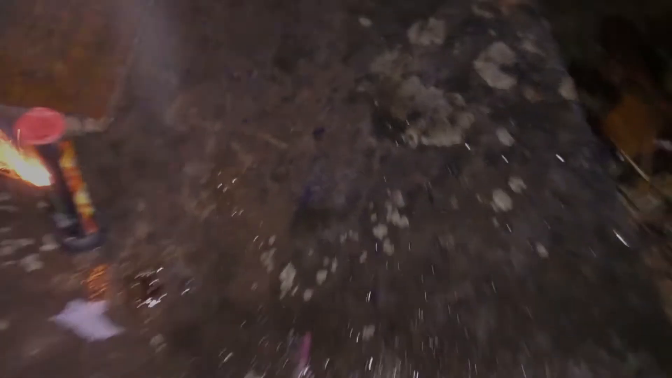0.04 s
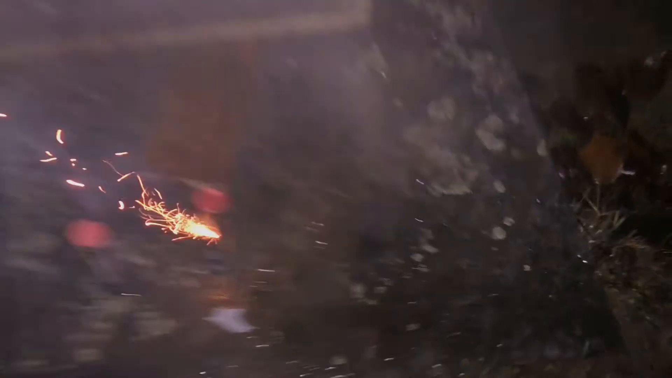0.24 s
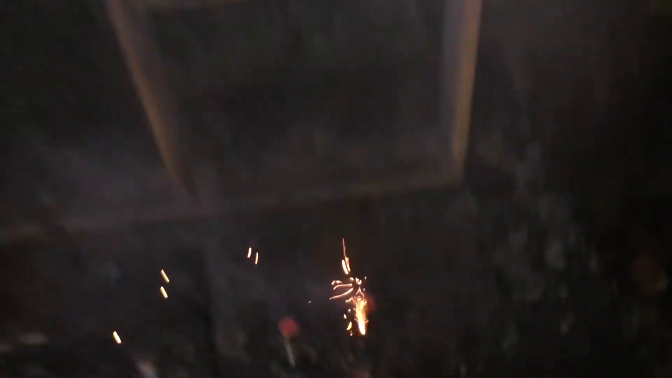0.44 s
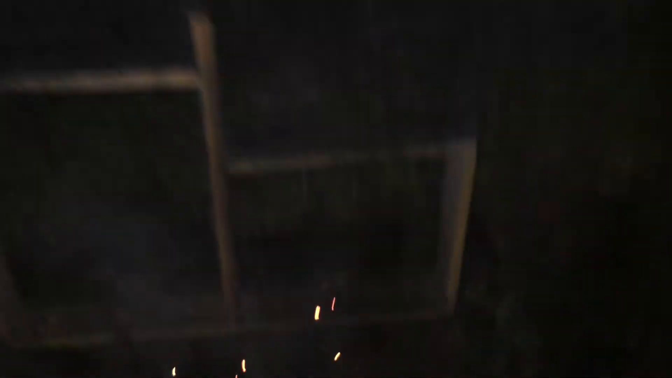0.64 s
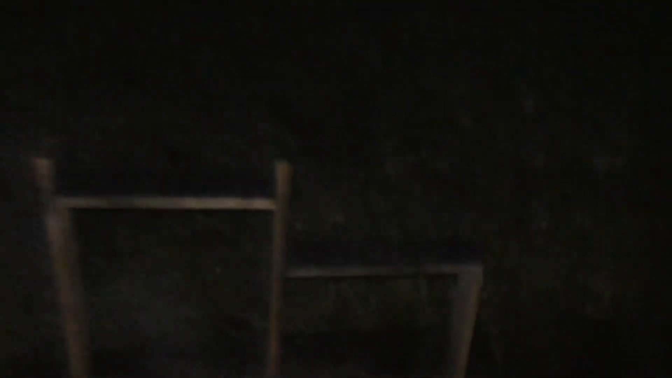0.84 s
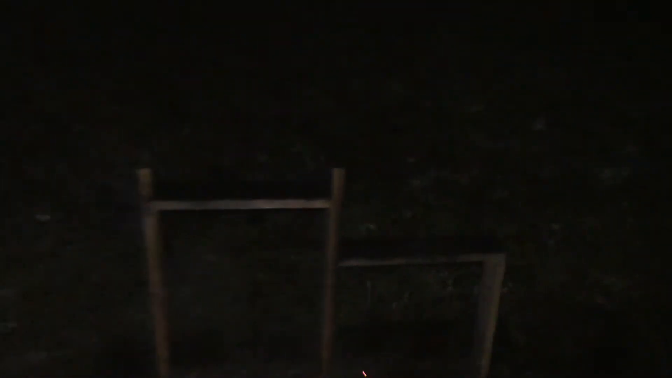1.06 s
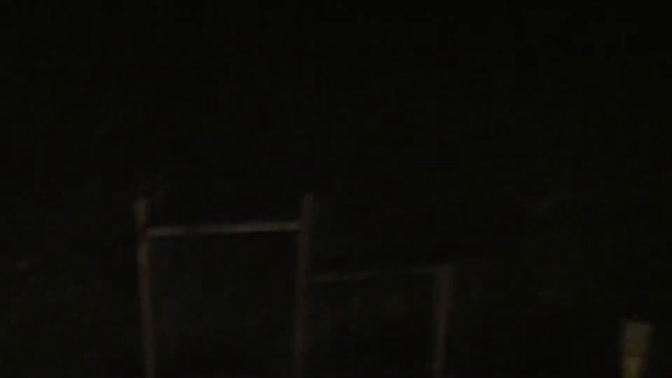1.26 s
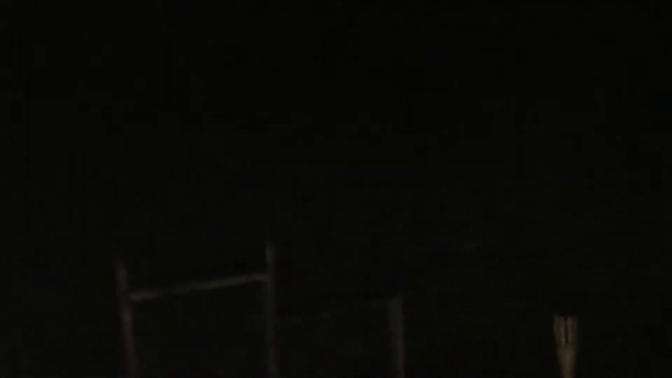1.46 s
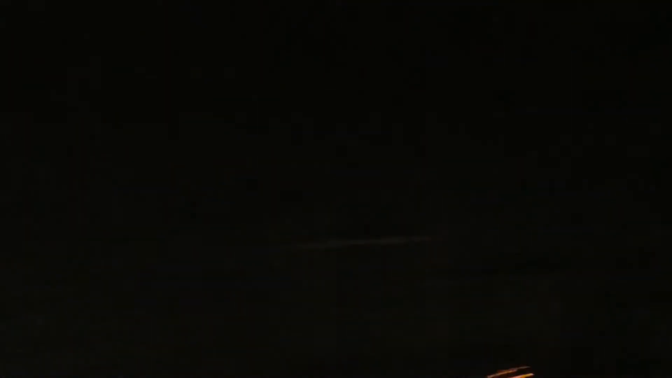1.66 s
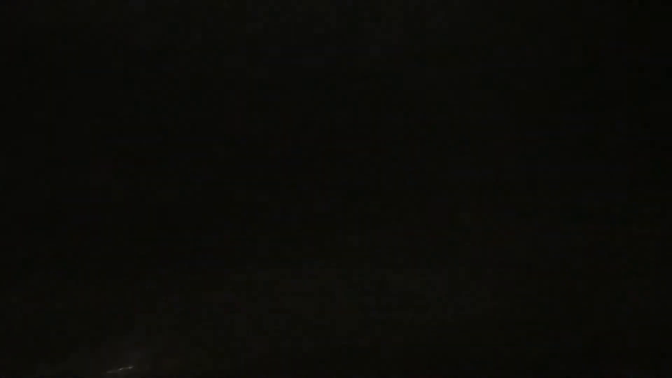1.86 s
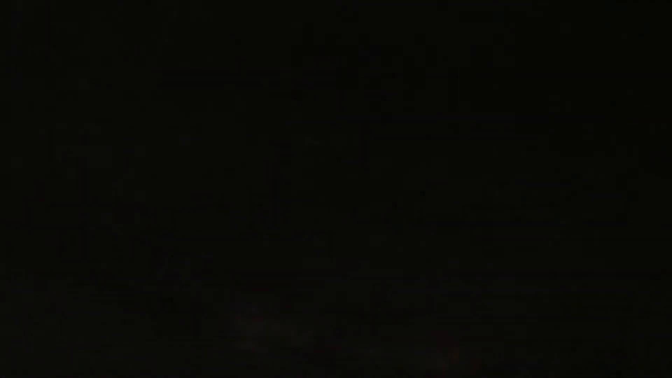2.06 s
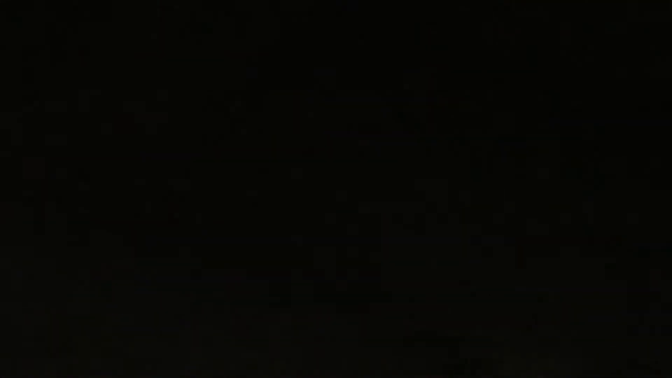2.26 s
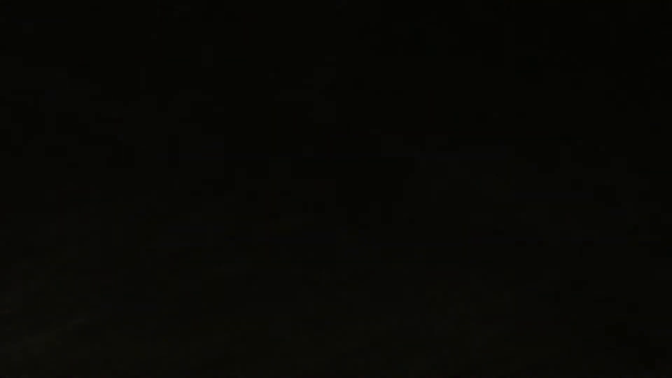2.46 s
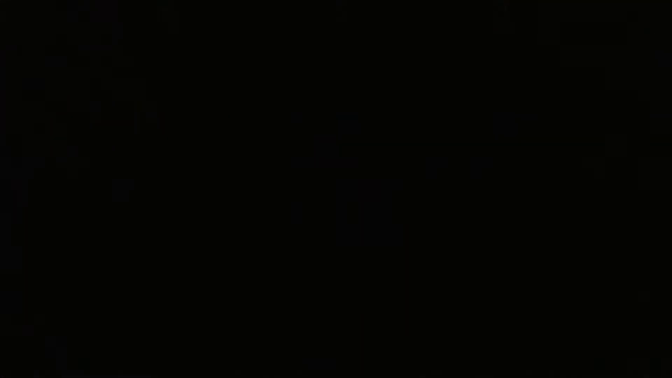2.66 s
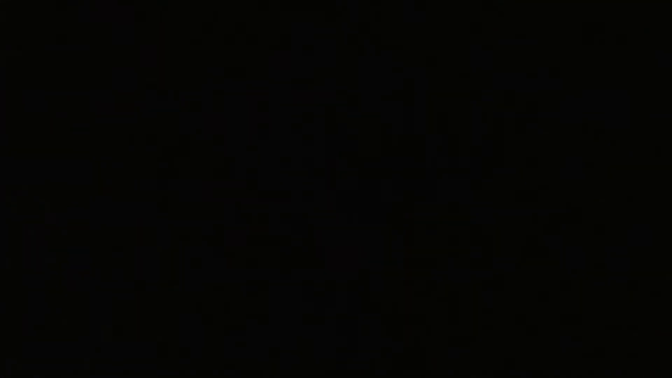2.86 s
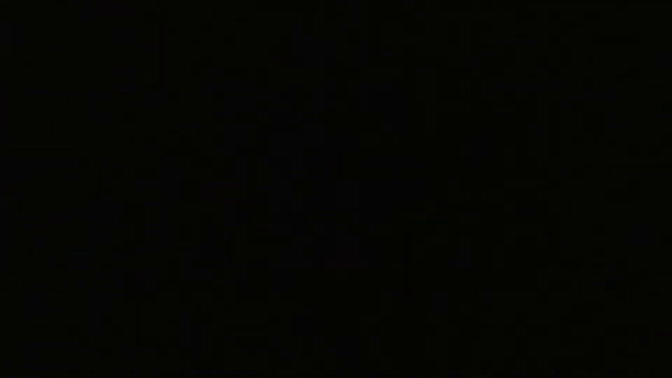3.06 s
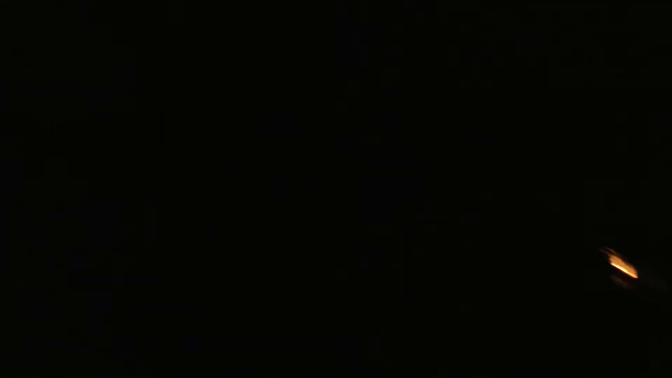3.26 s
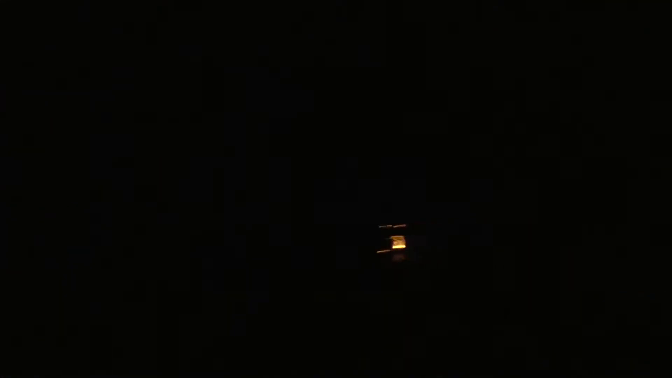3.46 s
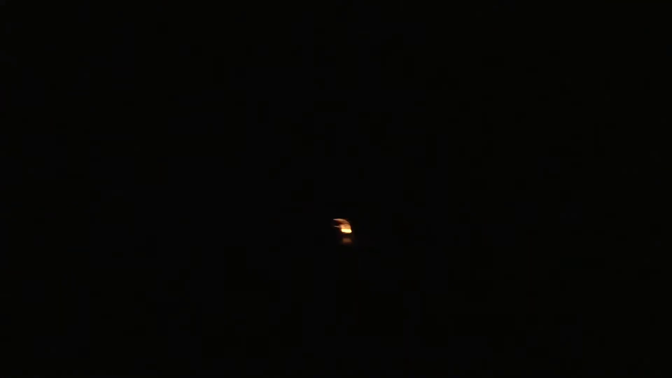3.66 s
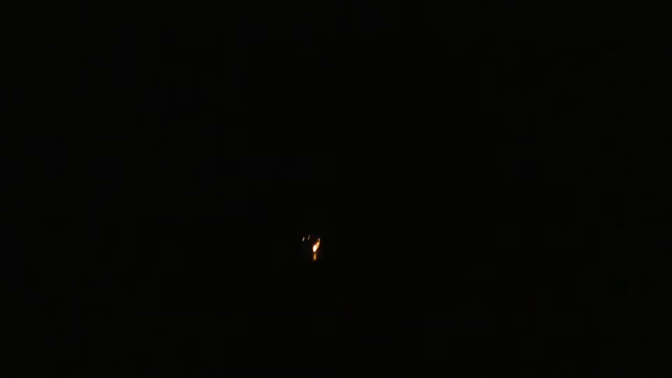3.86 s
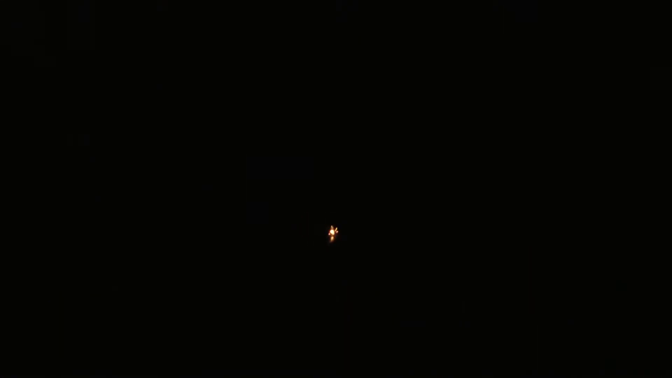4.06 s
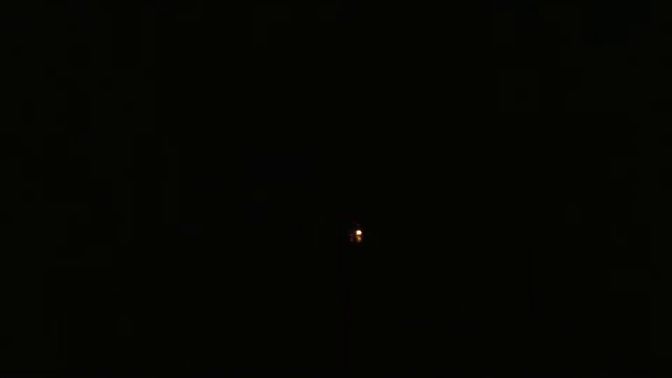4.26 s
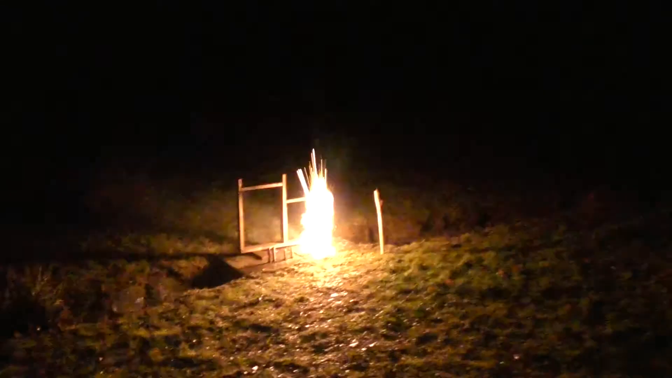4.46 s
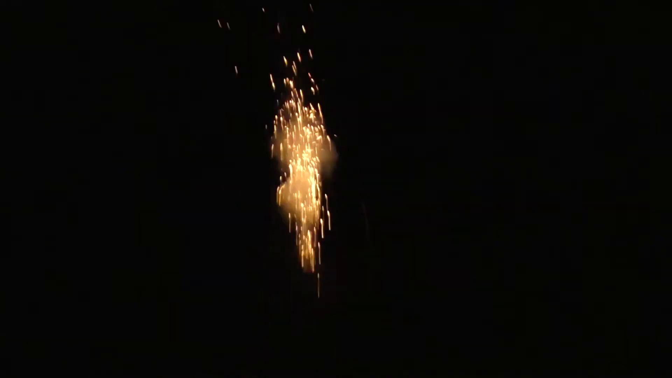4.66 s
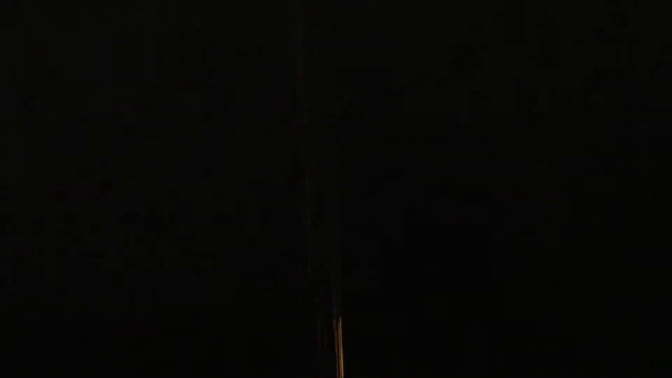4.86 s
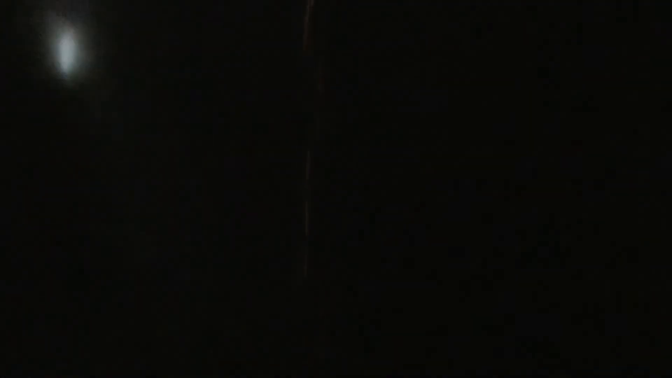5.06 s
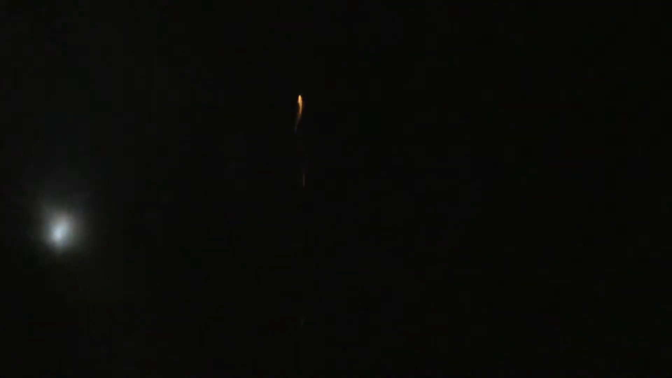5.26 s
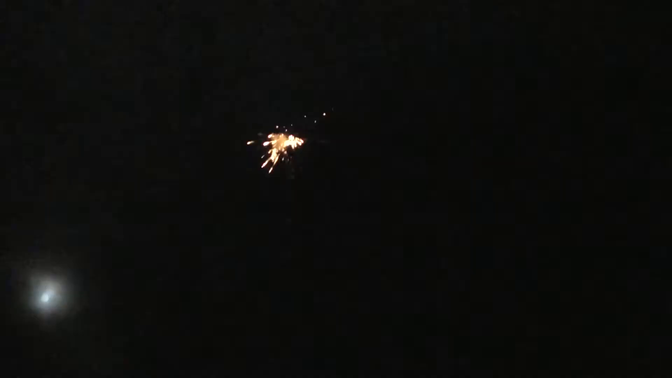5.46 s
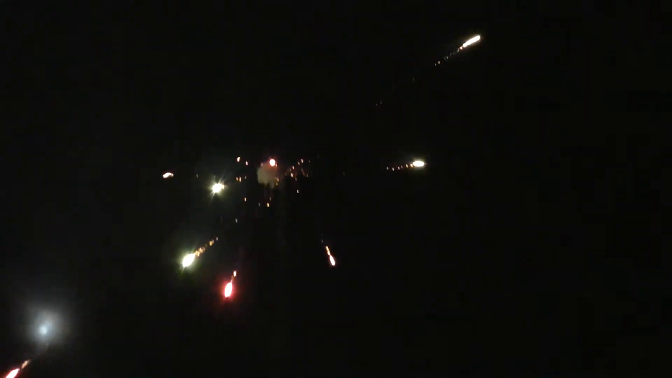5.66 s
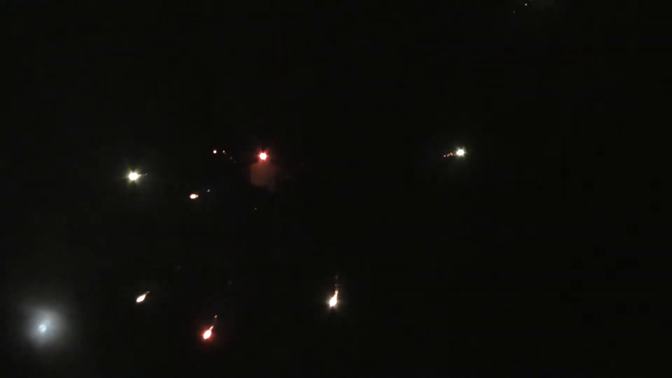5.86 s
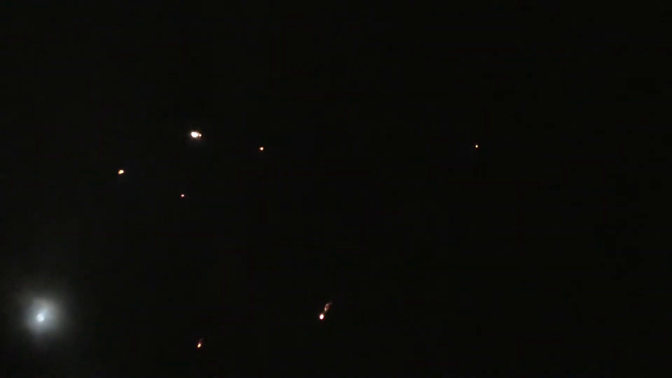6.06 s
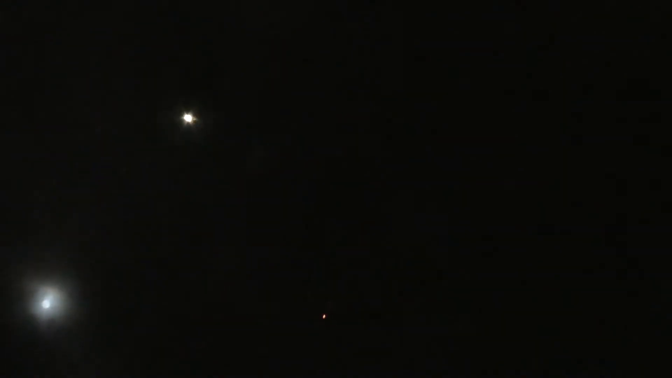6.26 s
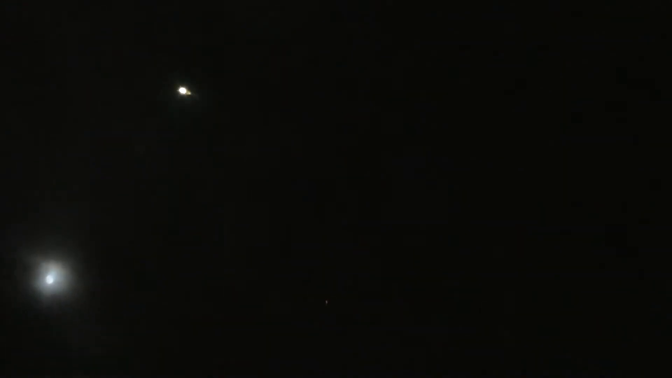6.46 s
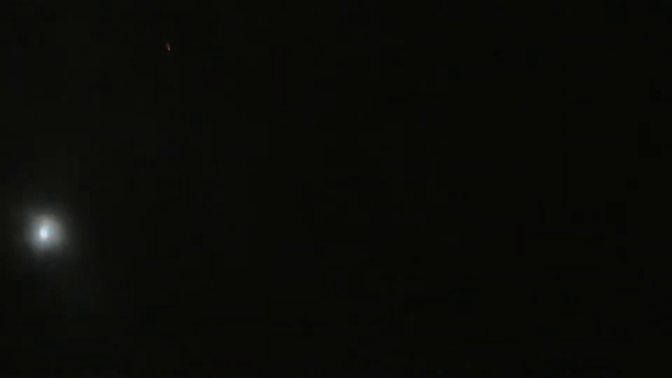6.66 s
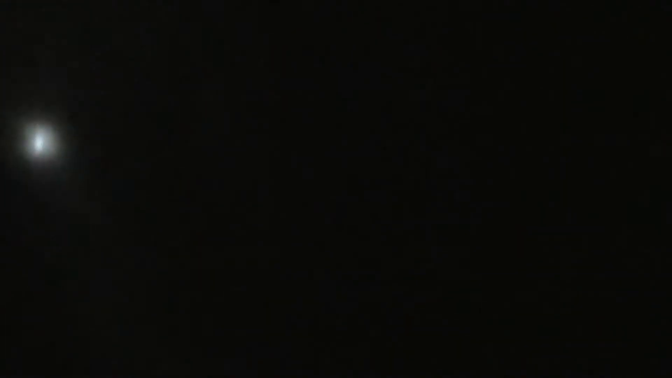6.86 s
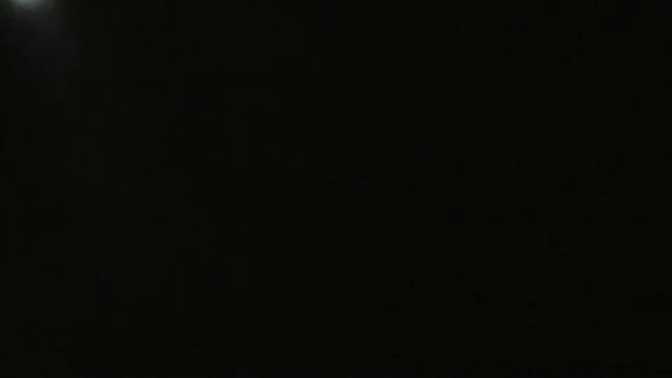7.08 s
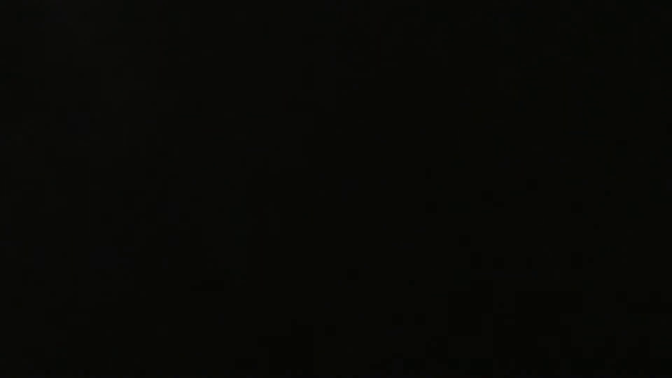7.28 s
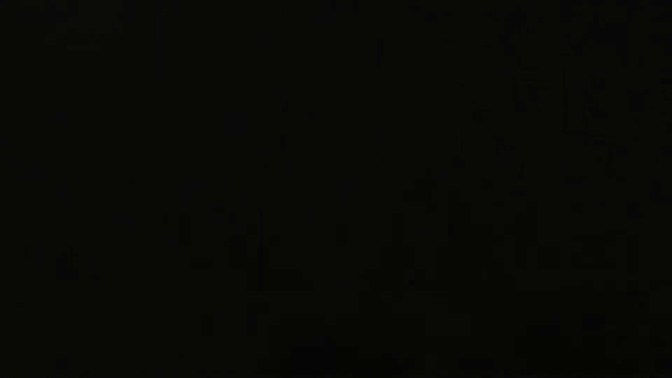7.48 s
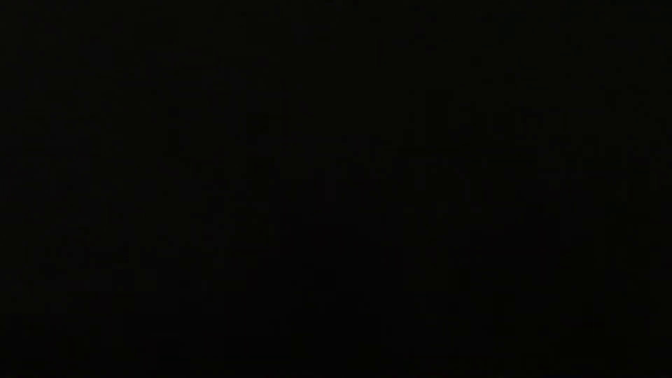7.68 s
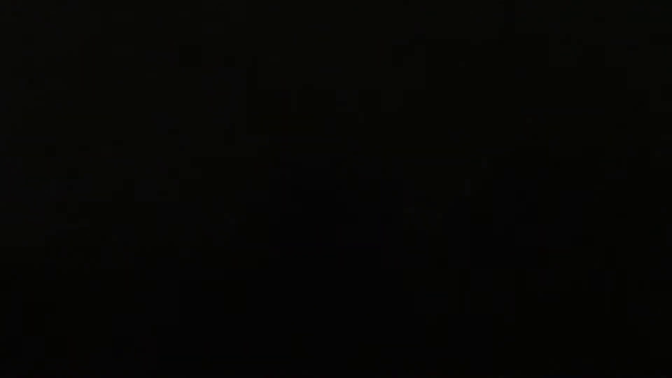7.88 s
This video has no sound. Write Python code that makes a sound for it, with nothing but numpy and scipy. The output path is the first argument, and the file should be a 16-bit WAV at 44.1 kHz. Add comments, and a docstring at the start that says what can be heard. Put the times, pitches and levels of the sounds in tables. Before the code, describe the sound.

A handheld microphone starts about a metre from a hissing, crackling fuse and moves off across grass, with footsteps, clothing rustle and low wind buffeting. Midway an unseen firework bangs dully and echoes. Then the nearby tube launches with a punchy crack and brief roar, followed by the loudest bang in the sky. Scattered snaps and a wide rumbling roll return from walls, trees and far slopes, fading to quiet.

```python
"""Damp open ground at night, with walls, trees and far slopes around: a firework tube is lit, fires and bursts.
The fuse hisses (filtered clicks with a ground-reflection comb) as the microphone is carried away over the grass.
A hidden firework thuds, the tube fires and its shell bursts: N-waves, a roar of shaped noise and fizzing sparks.
Each bang returns as single snaps and as a roll of clicks, duller the longer it has travelled; the loudest clip.
Beneath lie footsteps, wind at the microphone, low rumble, rustling grass and clothes, and faint hiss."""
import sys
import numpy as np
from scipy import signal
from scipy.fft import rfft, irfft
from scipy.io import wavfile
from scipy.ndimage import uniform_filter1d

SR = 44100
rng = np.random.default_rng(int(sys.argv[2]) if len(sys.argv) > 2 else 0)


def int16_out(signal):
    """Quantize to a 16-bit WAV file."""
    q = np.round(np.clip(np.atleast_2d(signal).T, -1, 1) * 32767)
    wavfile.write(sys.argv[1], SR, q.astype(np.int16))


N = 349536
TIME = np.arange(N) / SR


def amp(db):
    """Decibels to amplitude ratio."""
    return 10 ** (np.asarray(db) / 20)


def evened(x):
    """Scales a signal to an rms of one."""
    return x / np.sqrt(np.mean(x ** 2) + 1e-20)


def colour(points, hz):
    """Reads a spectrum in dB by interpolating along a log-frequency axis."""
    freq_hz, db = np.transpose(points)
    return np.interp(np.log(hz + 1), np.log(freq_hz), db)


def level(curve):
    """Gain over time from rows (time_s, level_db), silent outside them."""
    time_s, db = np.transpose(curve)
    return amp(np.interp(TIME, time_s, db, left=-np.inf, right=-np.inf))


def swell(peak_s, db, length_s, rise):
    """Power over time: a Gaussian rise lasting a share of the length, then an exponential decay."""
    age = (TIME - peak_s) / length_s
    exponent = np.where(age < 0, (age / rise) ** 2, age)
    return amp(db) ** 2 * np.exp(-2 * np.minimum(exponent, 40))


def add(mix, start_s, sound):
    """Superposes a stereo sound on the mix from its start time."""
    part = mix[:, round(start_s * SR):][:, :sound.shape[1]]
    part += sound[:, :part.shape[1]]


def band(x, hz, kind, order=2):
    """Causal Butterworth low-, high- or band-pass."""
    sos = signal.butter(order, np.clip(hz, 1, .49 * SR), kind, fs=SR, output="sos")
    return signal.sosfilt(sos, x)


def spread(pair, side_db):
    """Mid-side stereo: one signal is common to both channels, the other has opposite signs in them."""
    side = amp(side_db) * pair[1]
    return np.array([pair[0] + side, pair[0] - side])


def flutter(hz):
    """Random modulation of rms one: noise low-passed at the given rate."""
    spectrum = rfft(rng.standard_normal(N))
    lowpass = 1 / (1 + (np.fft.rfftfreq(N, 1 / SR) / hz) ** 4)
    return evened(irfft(spectrum * lowpass, N))


def grains(per_s, size_db, side_db):
    """Shot noise: random clicks of uneven size and either sign, each with a direction of its own."""
    size = amp(size_db * np.minimum(rng.exponential(1, (2, N)), 4))
    sign = rng.choice([-1, 1], (2, N))
    struck = rng.random((2, N)) < per_s / SR
    return spread(evened(size * sign * struck), side_db)


def shaped(x, field, size=512, patchy_db=0):
    """Time-varying filter: field(hz, s) in dB plus drifting patches, at unit mean-square gain in each frame."""
    overlap = size - size // 4
    hz, t, spectrum = signal.stft(x, SR, nperseg=size, noverlap=overlap)
    patches = rng.standard_normal((len(hz), len(t)))
    patches = uniform_filter1d(uniform_filter1d(patches, size=4, axis=0), size=24, axis=1)
    gain = amp(field(hz[:, None], t[None]) + patchy_db * evened(patches))
    gain = gain / np.sqrt(np.mean(gain ** 2, axis=0))
    return signal.istft(spectrum * gain, SR, nperseg=size, noverlap=overlap)[1][:, :N]


def fuse(sputter_db=1.02, rough_hz=42000, sway=0.021, mirror_near=0.23, mirror_far=.66,
         thin_start=0.19, thin_settled=0.38, thin_per_m=.12):
    """Inverse-distance spreading and ground interference: spitting powder fades, thins and its comb rises."""
    # spectra of the fuse close by and from a few metres: freq_hz, level_db_per_hz
    near_colour = [(150, -5), (500, 0), (1200, -1.5), (1750, 5.5), (2350, 2), (3000, -3.5), (4000, -4),
                   (7000, -2.5), (9500, -1), (12000, -4), (16000, -6)]
    thin_colour = [(150, 2.5), (500, -16.5), (1200, -15.5), (2300, -6), (4100, 0), (5500, -5), (7300, -1.5),
                   (9200, -1.5), (12000, -7.5), (16000, -3.5)]
    # the microphone moves away from the fuse: time_s, distance_m
    path = [(0, 0.98), (.5, 1.176), (1.2, 1.53), (1.55, 2.1), (2, 2.86), (3, 5.2), (3.7, 6.04), (4.2, 8.9)]
    # how fiercely the fuse burns, heard from one metre: time_s, level_db
    burn = [(0, -28), (.4, -31), (.53, -29.5), (.59, -34.5), (.73, -38), (.95, -32), (1.38, -35.5),
            (1.45, -30.5), (2.25, -31.5), (2.42, -37), (2.87, -35.5), (2.98, -29.5), (3.25, -32.5),
            (3.8, -27.5), (4.5, -30.5)]
    first_flare_s, settle_s = .54, 0.037  # the freshly lit end roars, then settles to a thinner hiss
    comb_hz_per_m = 2194  # spacing of the comb's peaks, in step with the distance
    port_lag_s = .000017  # the hiss reaches the left microphone port first

    def metres(t):
        return np.interp(t, *np.transpose(path))

    def field(hz, t):
        settled = np.clip((t - first_flare_s) / settle_s, 0, 1)
        thin = np.clip(thin_start + thin_settled * settled + thin_per_m * (metres(t) - 1), 0, 1)
        source_db = (1 - thin) * colour(near_colour, hz) + thin * colour(thin_colour, hz)
        hand_sway = 1 + sway * np.interp(t, TIME, flutter(18))
        spacing_hz = comb_hz_per_m * metres(t) * hand_sway
        strength = np.clip(mirror_near + (mirror_far - mirror_near) * settled, 0, .9)
        # rough ground scatters the treble out of the reflection
        mirror = strength * np.exp(2j * np.pi * hz / spacing_hz - hz / rough_hz)
        return source_db + 20 * np.log10(abs(1 + mirror))

    sparks = shaped(grains(per_s=16000, size_db=2.5, side_db=-14), field, patchy_db=2.1)
    left, right = sparks * level(burn) / metres(TIME) * amp(sputter_db * flutter(25))
    lag = np.exp(-2j * np.pi * np.fft.rfftfreq(N, 1 / SR) * port_lag_s)
    return np.array([left, irfft(rfft(right) * lag, N)])


def shocks(port_hz=130, bass_hz=60, scatter_s=0.0022):
    """Blast N-waves: pressure jumps, falls linearly below rest and recovers; lost deep bass adds overshoot."""
    # shock waves, levels before filtering: start_s, level_db, length_s, brightness_hz, ground_scatter_db
    blasts = [(2.1944, -3, 0.0066, 600, -10), (4.5057, -3, 0.0016, 6000, -34),
              (4.5092, 2.5, 0.0023, 2500, -10), (5.5184, 19.5, .0015, 6960, -25),
              (5.529, 2.5, 0.0017, 1490, -21)]
    out, t = np.zeros((2, N)), TIME[:4096]
    for start_s, db, length_s, bright_hz, scatter_db in blasts:
        wave = (1 - 2 * t / length_s) * (t < length_s)
        scatter = amp(scatter_db) * np.exp(-t / scatter_s) * rng.standard_normal((2, len(t)))
        heard = band(band(wave + scatter, bright_hz, "low"), port_hz, "high", order=1)
        add(out, start_s, amp(db) * heard)
    return band(out, bass_hz, "high", order=1)


def launch_roar(ring_at_s=4.5115, ring_db=-11, ring_hz=180, ring_decay_s=0.0056):
    """Turbulent jet and tube resonance: the lift charge drives out roaring gas and the air column rings."""
    # level of the launch roar, with a faint noise swelling just before it: time_s, level_db
    roar_level = [(4.485, -39), (4.5045, -24.5), (4.5053, -13.5), (4.509, 1.5), (4.511, -4), (4.514, -16),
                  (4.524, -31.5), (4.55, -41)]
    # its spectrum: freq_hz, level_db_per_hz
    roar_colour = [(60, -19.5), (230, -8.5), (450, -8), (900, -3), (1380, -15.5), (2100, -9), (3800, -11),
                   (6000, -18.5), (10000, -21.5), (15500, -27.5)]
    noise = spread(rng.standard_normal((2, N)), side_db=-14.5)
    out = shaped(noise, lambda hz, t: colour(roar_colour, hz)) * level(roar_level)
    t = TIME[:4096]
    ring = np.sin(2 * np.pi * ring_hz * t) * np.exp(-t / ring_decay_s)
    add(out, ring_at_s, amp([[ring_db], [ring_db]]) * ring)
    return out


def stars():
    """Combustion noise: burning powder in the sky fizzes as high-passed noise that decays exponentially."""
    # the climbing shell trails sparks and spits once, then its stars catch fire:
    # start_s, level_db, t60_s, lowest_hz
    bursts = [(4.751, -60, 2.8, 5000), (5.12, -62, .4, 9000), (5.53, -32, 0.7, 8500)]
    out, t = np.zeros((2, N)), TIME[:SR]
    for start_s, db, t60_s, above_hz in bursts:
        fizz = band(spread(rng.standard_normal((2, len(t))), side_db=6), above_hz, "high")
        add(out, start_s, amp(db) * evened(fizz) * np.exp(-np.log(1000) * t / t60_s))
    return out


def echoes(scatter_db=-17, scatter_s=0.0013, above=0.94):
    """Specular reflection: a wall or stand of trees returns the N-wave as a snap with a smear of scatter."""
    # single echoes off large surfaces: start_s, peak_db, pitch_hz, left_minus_right_db
    reflections = [(2.2213, -6, 1410, 2), (2.2518, -1, 1070, -1), (2.2531, -8, 860, 0),
                   (2.2622, -8, 900, 1), (2.2696, -5, 1390, -3), (2.308, -14, 1280, 0), (2.415, -8, 840, 0),
                   (2.4262, -16, 1040, 0), (4.5655, -18, 560, 11), (4.6262, -18.5, 850, 19),
                   (4.6647, -14, 710, -20), (4.8665, -21, 1190, -2), (5.0403, -28, 935, -19),
                   (5.122, -33, 500, 8), (5.5762, -6.5, 600, 3), (5.787, -12, 650, -3), (5.82, -8, 638, -4),
                   (5.8412, -9.5, 574, -1), (5.9684, -12, 855, 6), (6.0827, -6.5, 646, 27),
                   (6.2462, -13, 693, -4), (6.2579, -10.5, 610, 21), (6.4455, -15, 720, -2),
                   (6.5229, -16.5, 1120, -10), (6.5503, -13, 760.0, -7), (6.5592, -16, 825, -7),
                   (6.6103, -19.5, 1270.0, -19), (6.6658, -14.5, 610, -4), (6.6701, -7, 1485, -9),
                   (6.6727, -19.5, 514, -6), (7.5371, -25, 630, 3), (7.5756, -26.5, 643, 2.5),
                   (7.6592, -26.5, 652, 0), (7.8853, -25, 700, 2)]
    out, t = np.zeros((2, N)), TIME[:2048]
    for start_s, db, hz, pan_db in reflections:
        wave = (1 - 2 * t * hz) * (t * hz < 1)
        scatter = amp(scatter_db) * np.exp(-t / scatter_s) * rng.standard_normal((2, len(t)))
        snap = band(band(wave + scatter, hz, "high"), hz * above, "low")
        snap = snap * amp([[pan_db / 2], [-pan_db / 2]])
        add(out, start_s, amp(db) * snap / abs(snap.mean(0)).max())
    return out


def roll(start, until, early, db, rise_s, hold_s, fade_db_per_s, dull_after, dull_by, air_db,
         per_s, size_db, clump_db, side_db):
    """Diffuse reverberation: countless small reflections build up, hold and fade, with louder clusters on top."""
    # spectrum of the farthest echoes, mostly midrange: freq_hz, level_db_per_hz
    far_colour = [(50, -19.5), (110, -5.5), (220, -27), (350, -6), (550, 0.5), (750, 1.5), (1050, -7.5),
                  (1600, -6), (2500, -15.5), (4000, -25), (8000, -60), (15000, -91)]
    # clusters of echoes from stands of trees and slopes: peak_s, level_db, length_s
    returns = [(2.237, -20, 0.007), (2.266, -15.5, 0.033), (2.423, -27, 0.06), (3.156, -46.5, 0.34),
               (4.665, -23.5, 0.031), (4.749, -26, 0.022), (4.859, -33, .03), (5.128, -46, 0.022),
               (5.53, -16, 0.022), (5.569, -17, 0.018), (5.65, -17, 0.029), (5.746, -17, 0.05),
               (5.782, -16, 0.032), (5.833, -16.5, 0.074), (5.931, -23, 0.03), (6.02, -20, 0.041),
               (6.083, -25, .02), (6.255, -37, 0.035), (6.45, -32.5, 0.085), (6.618, -31.5, 0.16),
               (6.784, -34, .04), (7.028, -40, 0.035), (7.169, -36, .035), (7.693, -39, 0.19),
               (7.888, -38.5, 0.24)]

    def field(hz, t):
        age = t - start - dull_after
        far = np.clip(age / dull_by, 0, 1)
        # air_db is the tilt in dB per kHz and second: positive dulls, negative brightens
        loss = air_db * hz / 1000 * np.clip(age, -dull_after, 2.5)
        return (1 - far) * colour(early, hz) + far * colour(far_colour, hz) - loss

    age = TIME - start
    diffuse = amp(db - fade_db_per_s * np.maximum(age - hold_s, 0))
    clusters = sum(swell(*row, rise=0.7) for row in returns if start < row[0] < until)
    envelope = np.clip(age / rise_s, 0, 1) * np.sqrt(diffuse ** 2 + clusters)
    reflections = shaped(grains(per_s, size_db, side_db), field, patchy_db=1.3)
    return reflections * envelope * amp(clump_db * flutter(35))


def walk(width=0.24, rise_share=0.023, jolt_hz=29, jolt_decay_s=0.036):
    """Friction and impact: shoes rub as band-passed noise, and heavier steps jolt the microphone as damped sines."""
    # steps, scuffs and knocks: start_s, peak_db, pitch_hz, t60_s
    scuffs = [(.515, -30, 146, 0.041), (0.689, -30, 1240, 0.032), (.887, -27, 1780, 0.092),
              (0.957, -31, 1190, 0.061), (1.311, -24.5, 328, 0.025), (1.364, -29, 2020, 0.055),
              (1.409, -19.5, 460, 0.12), (1.491, -30.5, 348, 0.31), (1.855, -32, 720, 0.05),
              (2.505, -25, 2800, .025), (2.827, -29.5, 415, 0.031), (3.461, -24.5, 1660, 0.026),
              (3.463, -23, 6260, 0.011), (3.499, -33.5, 1500, .04), (3.841, -28, 230, 0.06),
              (4.243, -26.5, 1200, 0.098), (7.81, -49, 5800, 0.21)]
    # footfalls that jolt the microphone, before decay and balance: start_s, level_db
    jolts = [(0.961, -19.5), (1.852, -17), (3.835, -27), (4.261, -25)]
    out, t = np.zeros((2, N)), TIME[:11025]
    for start_s, db, hz, t60_s in scuffs:
        envelope = np.exp(-np.log(1000) * t / t60_s) * np.minimum(t / (rise_share * t60_s), 1)
        rub = spread(rng.standard_normal((2, len(t))), side_db=-6.5) * envelope
        rub = band(rub, [hz * np.exp(-width), hz * np.exp(width)], "band", order=1)
        rub = band(rub, 2.4 * hz, "low")
        add(out, start_s, amp(db) * rub / abs(rub).max())
    for start_s, db in jolts:
        shake = np.sin(2 * np.pi * jolt_hz * t) * np.exp(-t / jolt_decay_s)
        add(out, start_s, amp(db) * shake * amp([[1.5], [-1.5]]))  # stronger on the left
    return out


def air(low_walking_db=-41, low_resting_db=-47, left_db=2, rustle_walking_db=-47, rustle_resting_db=-59):
    """Turbulence and friction noise: wind, rumble and rustling, calmer once the walk ends, over steady hiss."""
    # gusts on the microphone, and at 4.7 s the low rumble of the launch's echoes: peak_s, level_db, length_s
    low_swells = [(1.05, -34.5, .15), (1.7, -32, .2), (2.3, -32, .12), (2.75, -36.5, .15), (4.3, -34, .1),
                  (4.7, -31, .1), (5.198, -58, 0.097), (7.423, -37.5, 0.038), (7.8, -41.5, 0.19)]
    # spectra of the wind and rumble, and of rustling grass and clothes: freq_hz, level_db_per_hz
    low_colour = [(10, -7), (25, -2), (40, -2.5), (60, -21.5), (100, -22), (200, -30.5), (500, -46),
                  (2000, -74.5)]
    rustle_colour = [(60, -2.5), (180, -6), (300, -2), (420, 0), (700, -6), (1500, -9), (3000, -16.5),
                     (6000, -19), (15000, -26)]
    stop_s, stopping_s = 5.12, 0.75  # the walk ends and the microphone comes to rest
    hiss_db = -70.5
    eddies, grass, hiss = rng.standard_normal((3, 2, N))
    resting = np.clip((TIME - stop_s) / stopping_s, 0, 1)

    breeze = amp(low_walking_db + (low_resting_db - low_walking_db) * resting)
    force = np.sqrt(breeze ** 2 + sum(swell(*row, rise=1.0) for row in low_swells))
    low = shaped(spread(eddies, side_db=1.0), lambda hz, t: colour(low_colour, hz), size=4096)
    low = low * force * amp(1.6 * flutter(21)) * amp([[left_db], [-left_db]])

    rustle_db = rustle_walking_db + (rustle_resting_db - rustle_walking_db) * resting
    rustle = shaped(spread(grass, side_db=-6), lambda hz, t: colour(rustle_colour, hz), size=1024)
    rustle = rustle * amp(rustle_db + 1.6 * flutter(15.5))
    return low + rustle + amp(hiss_db) * hiss


def scene():
    """Superposition: fuse, bangs and their echoes over the walk and the air."""
    # spectra of the early echoes of the hidden bang, the launch and the burst: freq_hz, level_db_per_hz
    hidden_colour = [(47, -43), (80, -4.5), (293, -18.5), (465, -3.5), (517, -5.5), (820, -1.5),
                     (892, -4.5), (1440, -5), (2880, -18.5), (3870, -20), (12000, -51.5), (15600, -76),
                     (22000, -120)]
    launch_colour = [(47, -37), (80, -12), (214, -1), (325, -1.5), (363, -5), (699, -9.5), (1080, -9.5),
                     (1750, -7.5), (2970, -14), (5020, -17), (15000, -39)]
    burst_colour = [(29, -53), (50, -21), (190, -6), (460, -3), (518, -3), (643, 0.5), (1140, -8.5),
                    (1670, -9), (2390, -16), (3030, -18.5), (8260, -33.5), (15000, -61)]
    hidden_s, launch_s, burst_s = 2.196, 4.515, 5.529
    hidden = roll(hidden_s, launch_s, hidden_colour, db=-24.0, rise_s=0.0019, hold_s=0.067, fade_db_per_s=41,
                  dull_after=.1, dull_by=4.4, air_db=0.0, per_s=3500, size_db=2, clump_db=0.5, side_db=-8.5)
    launch = roll(launch_s, burst_s, launch_colour, db=-31.5, rise_s=.03, hold_s=0.23, fade_db_per_s=48,
                  dull_after=0.12, dull_by=2.4, air_db=-0.5, per_s=2500, size_db=1.5, clump_db=0.74, side_db=-5.0)
    burst = roll(burst_s, np.inf, burst_colour, db=-24.0, rise_s=0.0033, hold_s=0.42, fade_db_per_s=13,
                 dull_after=0.22, dull_by=1.57, air_db=2.0, per_s=4000, size_db=1.1, clump_db=1.1, side_db=-5.0)
    bangs = shocks() + launch_roar() + stars()
    returned = echoes() + hidden + launch + burst
    return fuse() + bangs + returned + walk() + air()


def record(dry):
    """Overload and band limit: peaks clip at full scale, then a linear-phase low-pass cuts the top treble."""
    clipped = np.clip(dry, -1, 1)
    lowpass = signal.firwin(511, 16000, window=("kaiser", 9), fs=SR)
    return signal.oaconvolve(clipped, lowpass[None], "same")


dry = scene()
out = record(dry)
int16_out(out)
```